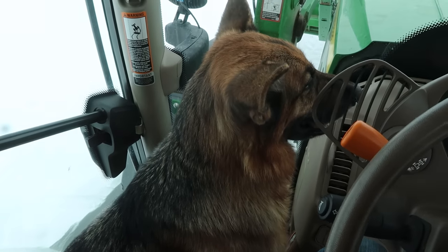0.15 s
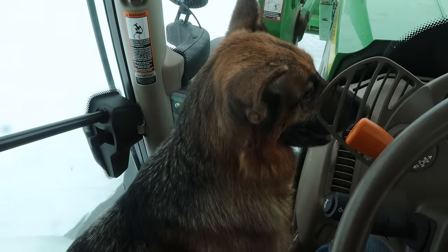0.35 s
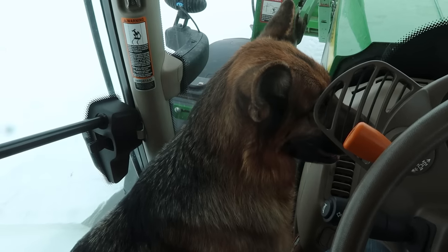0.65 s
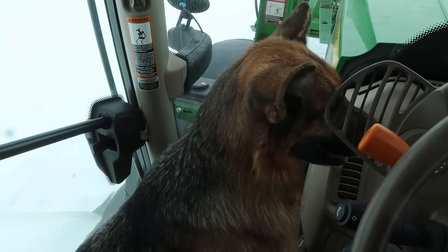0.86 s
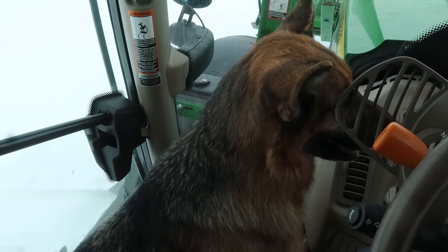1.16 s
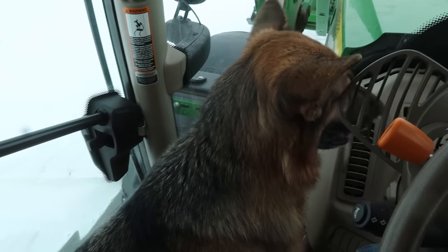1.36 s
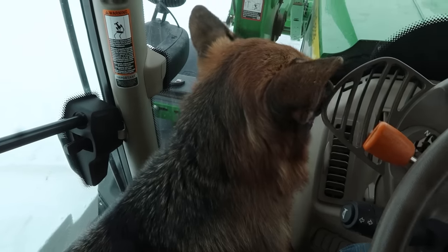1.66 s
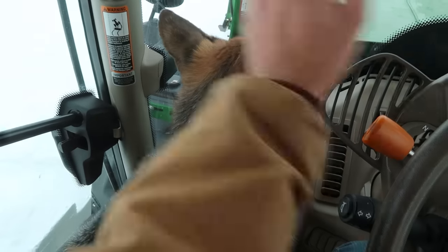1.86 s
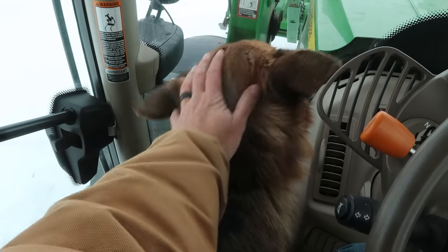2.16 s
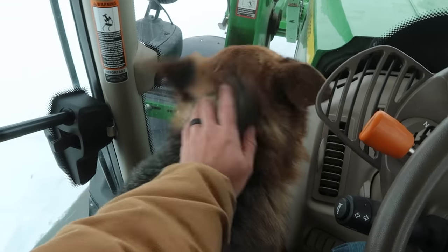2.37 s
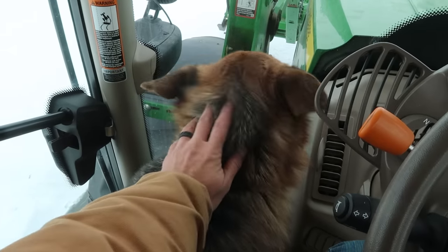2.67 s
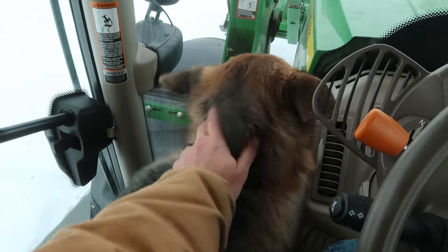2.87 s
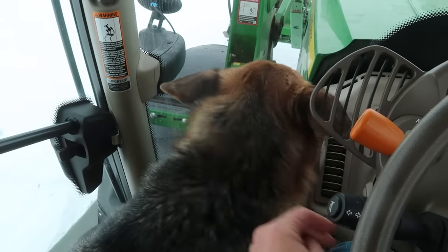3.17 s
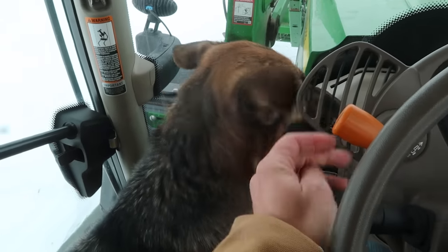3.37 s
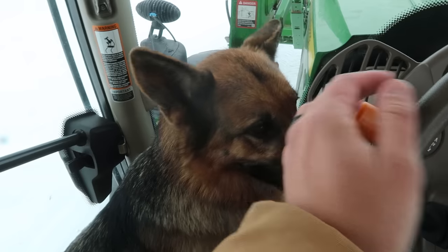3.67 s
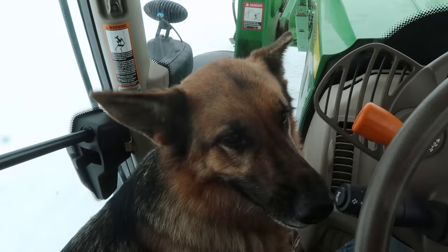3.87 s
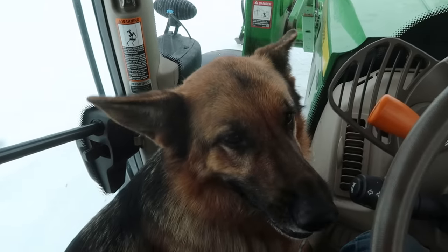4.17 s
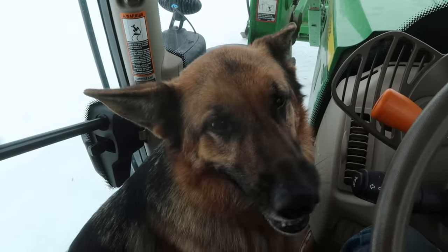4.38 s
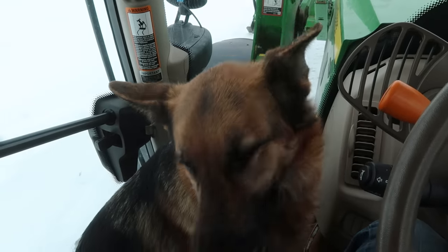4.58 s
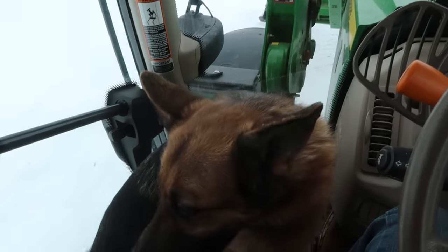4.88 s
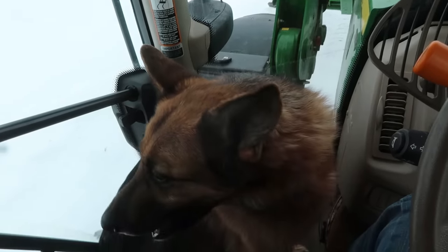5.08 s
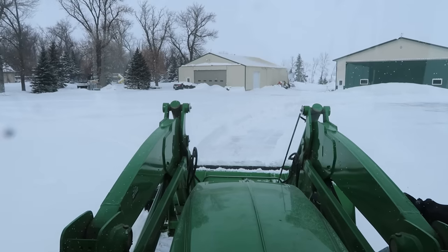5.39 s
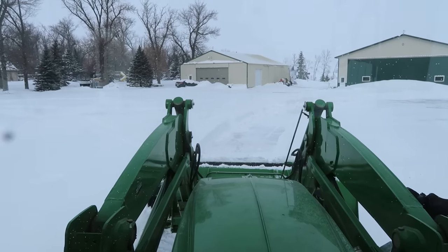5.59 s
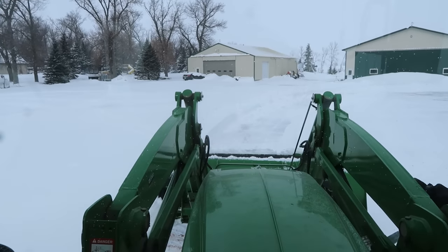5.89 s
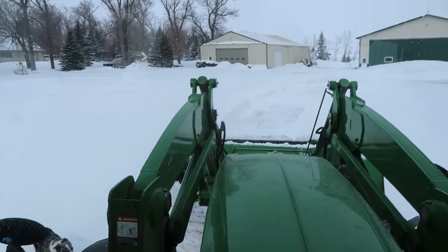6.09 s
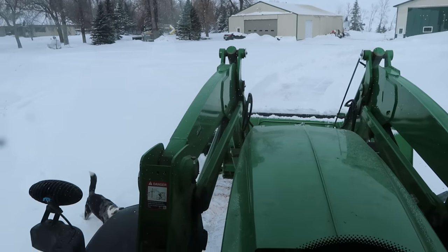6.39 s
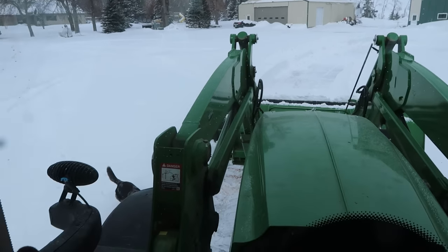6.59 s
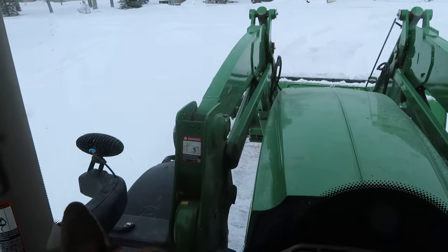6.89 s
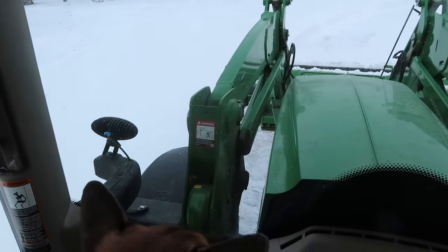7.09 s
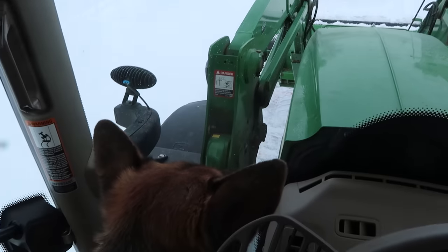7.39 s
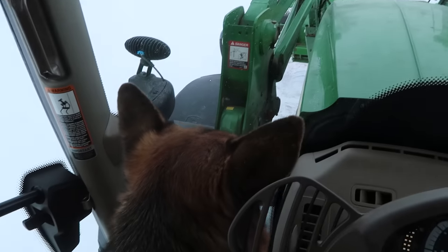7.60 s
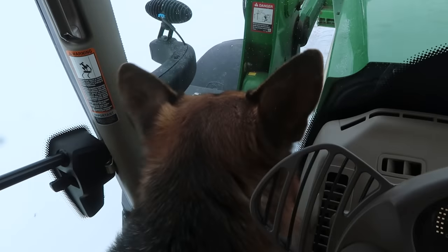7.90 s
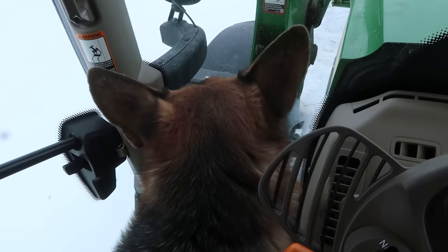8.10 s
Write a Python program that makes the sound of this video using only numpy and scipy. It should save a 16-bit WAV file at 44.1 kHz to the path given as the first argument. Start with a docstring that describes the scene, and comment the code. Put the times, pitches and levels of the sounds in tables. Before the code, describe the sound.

Inside a tractor cab, a diesel engine drones and roars while loose trim rattles, then the sound abruptly drops to a lower, rougher, surging rumble.

```python
"""A diesel tractor booms and roars in its cab as it drives a snowblower, heard on two close microphone ports.
A loose trim part rattles in bursts; the sound drops out for an instant and resumes lower in engine speed,
rougher, with a pump whine, a lumpy hum and one brushing scuff.
Boom is sines on the crank angle, roar is coloured noise that throbs with the engine, the trim is decaying
rings struck by random knocks, the whines are wavering tones and the scuff is filtered ticks."""
import sys
import numpy as np
from scipy import signal
from scipy.fft import rfft, irfft
from scipy.io import wavfile
from scipy.ndimage import uniform_filter1d

SR = 44100
rng = np.random.default_rng(int(sys.argv[2]) if len(sys.argv) > 2 else 0)


def transcribe(signal):
    """Save signal, clipped to [-1, 1], as a 16-bit WAV file at the path in sys.argv[1]."""
    frames = np.atleast_2d(signal).T
    limited = np.clip(frames, -1, 1)
    pcm = np.round(limited * 32767).astype(np.int16)
    wavfile.write(sys.argv[1], SR, pcm)


N = 363807
T = np.arange(N) / SR
DROP_OUT_S, RESUME_S = 5.21778, 5.24215  # silence between these times


def gain_of(db):
    """Amplitude factor of a level in dB."""
    return 10 ** (np.asarray(db) / 20)


def evened(x):
    """The signal brought to rms 1."""
    return x / np.sqrt(np.mean(x ** 2) + 1e-20)


def read(points, hz):
    """A spectrum curve read along log frequency."""
    f, value = np.transpose(points)
    return np.interp(np.log(hz + 1), np.log(f + 1), value)


def columns(rows, t):
    """Each column after the time column, drawn as straight lines over time."""
    s, *cols = np.transpose(rows)
    return [np.interp(t, s, col) for col in cols]


def bump(middle, half):
    """A flat-topped hump of height 1."""
    return np.exp(-((T - middle) / half) ** 4)


def add(mix, s, sound):
    """Add a sound into the mix in place, from time s on."""
    part = mix[round(s * SR):][:len(sound)]
    part += sound[:len(part)]


def waver(hz):
    """Slow chance with rms about 1, rolled off above the given rate."""
    steps = np.arange(4096) * 128 / SR
    rates = np.fft.rfftfreq(len(steps), steps[1])
    spectrum = rfft(rng.standard_normal(len(steps))) / (1 + (rates / hz) ** 4)
    return evened(np.interp(T, steps, irfft(spectrum)))


def noise(db):
    """Random short-time spectra under a field of dB per Hz (bins x frames)."""
    chance = rng.standard_normal(db.shape) + 1j * rng.standard_normal(db.shape)
    sound = signal.istft(gain_of(db) * chance, nperseg=4096, noverlap=3072)[1][:N]
    return sound * np.sqrt(3 * SR / 2 / 4096)


def boom(speed, levels, faint, mode, against, crank, waver_db, flicker_db, shared_db, slip_cycles):
    """Each crank order is a sine on the engine speed; uneven firing makes it waver. The main orders peak with a
    firing, those below the order `against` pull the other way, and a cab air mode delays those on and above it."""
    anchor_s, anchor_turns = crank
    turns = np.cumsum(speed) / SR
    turns = turns - np.interp(anchor_s, T, turns) + anchor_turns
    mode_order, mode_width, mode_gain = mode
    out, load_db = 0, shared_db * waver(5.4)
    for order, db in levels:
        order = round(order)
        air_mode = 1 - 1j * mode_gain / (1 + 2j * (order - mode_order) / mode_width)
        lag = np.angle(air_mode) + np.pi * (order < against)
        level = gain_of(db + load_db + waver_db * waver(9.4) + flicker_db * waver(16))
        cycles = order * turns + slip_cycles * waver(5)
        out = out + level * np.cos(2 * np.pi * cycles + lag)
    for order, db in faint:
        level = gain_of(db + 1.8 * waver(3.8))
        cycles = order * turns + rng.random() + 0.028 * waver(4.5)
        out = out + level * np.sin(2 * np.pi * cycles)
    return np.sqrt(2) * out, turns


def steady_speed():
    """Crank turns per second before the drop-out; the engine wanders a little."""
    # engine speed: (time [s], speed [turns/s])
    wandering = [(0, 34.95), (.4, 34.88), (.75, 34.97), (1.3, 34.71), (1.7, 34.97), (2.1, 35.16),
                 (2.45, 34.94), (2.9, 35.17), (3.3, 34.79), (3.52, 34.71), (3.9, 35.23), (4.1, 35.33),
                 (4.5, 35.17), (4.9, 34.79), (5.21, 34.85)]
    return columns(wandering, T)[0]


def steady_orders(speed):
    """Levels follow the speed as each order climbs or leaves a cab resonance, and drift slowly."""
    # main crank orders: (order [multiple], level [dB], slope [dB per extra turn/s], drift [dB/s])
    orders = [(1, -24.5, -3, 0.4), (2, -42.5, 9, 0), (3, -18, 7, -0.5), (4, -18.5, -4, -0.14),
              (5, -29.5, 5.5, -0.8), (6, -23, 5, -.5), (7, -35.5, -0.5, -2)]
    wander, since = speed - speed[T < DROP_OUT_S].mean(), T - DROP_OUT_S / 2
    return [(order, db + slope_db * wander + drift_db * since) for order, db, slope_db, drift_db in orders]


def steady_boom(speed):
    """The boom before the drop-out, with two higher gear meshes that grow as the load comes on."""
    # faint orders; unequal firing gives the halves, gears the high ones: (order [multiple], level [dB])
    faint = [(1.5, -46), (5.5, -38), (2.54, -48.5), (3.46, -35.5), (6.82, -36), (7.5, -40), (7.99, -40),
             (8.54, -43), (8.99, -41.5), (12, -45), (17.74, -44), (19.5, -47.5), (20.56, -45), (21.73, -41),
             (22.06, -39.5), (22.53, -43), (23.9, -45.5), (28.85, -45)]
    # gear meshes under load: (time [s], lower mesh [dB], upper mesh [dB])
    mesh_levels = [(0, -46, -44), (1.5, -45, -45.5), (1.9, -35, -35.5), (2.9, -36, -41.5), (3.4, -37, -47),
                   (4.0, -37, -42), (5.2, -44, -41)]
    meshes = list(zip((27.5, 36.1), columns(mesh_levels, T)))  # orders of the two meshes
    return boom(speed, steady_orders(speed), faint + meshes,
                mode=(3.95, .17, 6),  # cab air mode at the ports: order, width in orders, gain
                against=3,  # firings a turn
                crank=(DROP_OUT_S, .355),  # on a pressure peak as the sound drops out (s, turns)
                waver_db=0.5, flicker_db=0.64, shared_db=0.71, slip_cycles=0.011)


def lulls():
    """The dB by which the boom sags two or three times a second: slow sag, quick return."""
    # sags: (time [s], depth [dB])
    sags = [(5.44, -2), (5.59, -11.5), (6.0, -8.5), (6.42, -7), (6.69, -8), (6.84, -6), (7.14, -1.5),
            (7.37, -4), (7.71, -8.5), (8.12, -9)]
    sag_s, return_s = 0.11, 0.06
    return sum(db * np.exp(-((T - s) / np.where(T < s, sag_s, return_s)) ** 2) for s, db in sags)


def surging_orders():
    """Under uneven load all orders sag in the lulls and drift slowly; some swell or fade for a moment."""
    # main crank orders: (order [multiple], level between lulls [dB], share of each lull [1], drift [dB/s])
    orders = [(1, -31, 0.46, 0.5), (2, -31, 0.42, -0.5), (3, -24.5, .6, -0.4), (4, -17, 0.84, -0.5),
              (5, -26.5, 0.29, -0.5), (6, -36, 0.25, -1)]
    # passing swells: (order [multiple], middle [s], half length [s], rise [dB])
    swells = [(1, 5.38, 0.2, 15), (4, 5.79, 0.054, 0.5), (4, 6.54, 0.092, 2.5), (3, 5.6, 0.07, -9),
              (3, 6.22, 0.082, 4.5), (3, 7.6, .12, -3), (3, 7.13, 0.16, -9), (3, 5.72, .07, 2),
              (3, 7.47, 0.086, 6.5), (5, 5.8, 0.064, 2), (6, 6.2, .25, 5), (1, 7.78, .15, 6)]
    lull, since = lulls(), T - T[T > RESUME_S].mean()
    swell = {round(order): 0 for order, *_ in orders}
    for order, s, half, db in swells:
        swell[round(order)] = swell[round(order)] + db * bump(s, half)
    return [(order, db + share * lull + drift_db * since + swell[round(order)])
            for order, db, share, drift_db in orders]


def surging_boom():
    """The boom after the drop-out: a lower engine speed, with more phase slip and flicker."""
    # engine speed: (time [s], speed [turns/s])
    speed = [(5.24, 33.68), (6.0, 33.62), (7.0, 33.98), (7.6, 33.72), (8.25, 33.65)]
    # faint orders; unequal firing gives the halves, gears the high ones: (order [multiple], level [dB])
    faint = [(.5, -40.5), (5.5, -38.5), (17.73, -45.5), (32.65, -50.5), (55.2, -44.5)]
    return boom(columns(speed, T)[0], surging_orders(), faint,
                mode=(.8, 1, 30),  # cab air mode at the ports: order, width in orders, gain
                against=0,
                crank=(RESUME_S, .3),  # on a pressure peak as the sound resumes (s, turns)
                waver_db=0.4, flicker_db=1.0, shared_db=0.35, slip_cycles=0.036)


def roar(swell, treble, colour, panels, wide, turns, clatter, patchy_db):
    """Coloured noise that rings the panels, throbbing with the engine cycle and the firings."""
    hz, t = np.fft.rfftfreq(4096, 1 / SR)[:, None], np.arange(N // 1024 + 5) * 1024 / SR
    body, low = columns(swell, t)
    since = t - (swell[0][0] + swell[-1][0]) / 2
    upper, hiss, top = (share * body + drift_db * since for share, drift_db in treble)
    deep = 0.27 * np.interp(t, T, lulls())  # share of the lulls in the deepest roar
    # each band's swell gives way to the next around these frequencies
    moves, below = deep, deep
    for edge_hz, band in zip((190, 400, 1500, 5000, 7500), (low, body, upper, hiss, top)):
        moves = moves + (band - below) / (1 + (edge_hz / (hz + 1)) ** 6)
        below = band
    rings = sum(db / (1 + (2 * (hz - f) / width) ** 2) for f, width, db in panels)
    grain = uniform_filter1d(rng.standard_normal(moves.shape), 5, 0)
    patches = evened(uniform_filter1d(grain, 6, 1))
    common = noise(read(colour, hz) + rings + moves + patchy_db * patches)
    apart = noise(read(wide, hz) + .4 * rings + moves)
    # one engine cycle takes two turns and holds six firings
    pulses = np.cos(np.pi * turns) + .7 * np.cos(3 * np.pi * turns) + 1.3 * np.cos(6 * np.pi * turns)
    throb = 1 + clatter * pulses + 0.066 * waver(23)
    return np.array([common * throb, apart * throb])


def steady_roar(turns):
    """Roar of engine, gears and blower before the drop-out."""
    # swell about the mean: (time [s], body [dB], low lumps [dB])
    swell = [(0, -1, 1.5), (.5, -0.5, 0), (1.0, -0.5, 2), (1.45, 0.5, 2.5), (1.8, 1, 2), (2.3, 0.5, 3),
             (2.9, 1, 2), (3.25, 0, -2), (3.55, 2.5, 3), (4.45, -3.5, -4), (5.0, 0, -0.5), (5.21, 1, 4)]
    # upper body, hiss, highest hiss: (share of the body's swell [1], drift [dB/s])
    treble = [(.4, 0.046), (.8, 0.043), (1.1, .05)]
    # colour common to both ports: (frequency [Hz], density [dB per Hz])
    colour = [(20, -63), (50, -59.5), (82, -60.5), (120, -54), (160, -57.5), (200, -55), (270, -52),
              (460, -60.5), (900, -63), (1500, -62), (2800, -71.5), (3600, -77), (5200, -86.5), (7500, -95),
              (10800, -99), (13500, -117)]
    # cab panels that the roar rings: (frequency [Hz], width [Hz], height over the roar [dB])
    panels = [(239, 23, 6.5), (409, 14, 7), (492, 20, 6.5), (548, 27, 5.5), (625, 15, 8.5), (675, 31, 5),
              (752, 54, 9.5), (799.5, 24, 9), (830, 20, 6), (935, 11, 8), (997.4, 22, 11.5),
              (1067, 12, 6.5), (1274, 65, 6), (1384, 47, 2.5), (1696, 34, 3.5), (2394, 26, 9)]
    # colour differing between the ports: (frequency [Hz], density [dB per Hz])
    wide = [(40, -82), (130, -68), (250, -86.5), (420, -74), (800, -86.5), (1300, -75.5), (2400, -81),
            (3200, -81.5), (5300, -87), (8000, -93), (11000, -91.5), (13000, -92), (15100, -103)]
    return roar(swell, treble, colour, panels, wide, turns, clatter=0.046, patchy_db=1.5)


def surging_roar(turns):
    """Roar of engine, gears and blower after the drop-out."""
    # swell about the mean: (time [s], body [dB], low lumps [dB])
    swell = [(5.24, -3, 0.5), (5.5, -0.5, -7), (5.75, 1.5, 2), (6.2, -0.8, -1.5), (6.5, -0.5, 2),
             (6.74, -2, 1), (7.0, 3.5, 6), (7.24, 0, -1), (7.7, 1.5, 3), (8.25, 0.5, 0)]
    # upper body, hiss, highest hiss: (share of the body's swell [1], drift [dB/s])
    treble = [(0.33, .7), (.6, 1.8), (.3, 3.1)]
    # colour common to both ports: (frequency [Hz], density [dB per Hz])
    colour = [(20, -55.5), (55, -49), (85, -48), (160, -47.5), (280, -51), (500, -56.5), (900, -62),
              (1500, -64), (2800, -64.5), (3600, -74), (5200, -86.5), (7500, -98.5), (10800, -110),
              (13500, -130)]
    # cab panels that the roar rings: (frequency [Hz], width [Hz], height over the roar [dB])
    panels = [(103.4, 20, 9.5), (137, 16, 5), (241, 16, 5.5), (355, 47, 5.5), (592, 36, 2.5), (700, 50, 3),
              (817, 25, 3.5), (1120, 91, -6.5), (1215, 67, 3.5), (1360, 22, 6), (1610, 54, -1),
              (1780, 22, 4), (2205, 60, 5), (2470, 120, 5), (2790, 110, 4)]
    # colour differing between the ports: (frequency [Hz], density [dB per Hz])
    wide = [(50, -85), (130, -74), (250, -72.5), (420, -75.5), (800, -81), (1300, -75.5), (2250, -76),
            (2450, -69.5), (2650, -78), (3200, -77.5), (5300, -89), (8000, -97.5), (12000, -101),
            (15100, -115)]
    return roar(swell, treble, colour, panels, wide, turns, clatter=0.044, patchy_db=1.5)


def rattle(turns):
    """The trim chatters against its frame in short bursts, its knocks a little stronger on the firings."""
    # bursts, before fades are added: (middle [s], length [s], chatter [dB], main ring [dB])
    bursts = [(0.01, 0.02, -42, -44), (0.08, .045, -57, -54), (.148, .045, -59, -51),
              (.219, 0.035, -50, -48), (.267, 0.036, -48, -46), (0.316, 0.042, -42, -50),
              (0.406, .094, -54, -50), (0.507, 0.047, -48, -48), (0.56, 0.042, -47, -48),
              (0.633, 0.063, -44, -45), (0.7, 0.13, -46, -46.5), (.79, .046, -45, -52),
              (0.878, 0.11, -45, -45.5), (1.047, 0.067, -43, -48), (1.159, 0.099, -43.5, -49),
              (1.268, 0.12, -51, -55), (1.466, 0.044, -40, -49), (1.526, 0.039, -42, -47),
              (1.598, 0.05, -43.5, -52), (1.674, 0.088, -41.5, -45), (1.747, .048, -46, -48),
              (1.849, 0.056, -38.5, -45), (1.94, 0.058, -39.5, -44), (2.042, 0.041, -46, -49),
              (2.15, .045, -43, -54), (2.244, 0.076, -42.5, -46), (2.317, 0.054, -45, -45),
              (2.385, .044, -54, -47), (2.443, 0.038, -45, -51), (2.495, 0.049, -43, -48),
              (2.568, 0.059, -41, -49), (2.66, 0.13, -41, -49), (2.782, 0.062, -39, -44),
              (2.856, 0.068, -42, -46), (3.075, 0.16, -42, -47.5), (3.193, .04, -50, -50),
              (3.25, 0.04, -45, -48), (3.3, .041, -46, -52), (3.365, 0.042, -47, -50),
              (3.44, 0.07, -41, -45), (3.509, 0.056, -39.5, -47), (3.578, 0.035, -40, -49),
              (3.675, 0.051, -42, -46), (3.82, 0.048, -41, -58), (3.89, 0.061, -45, -46.5),
              (4.013, 0.04, -39.5, -53), (4.102, 0.02, -46, -46), (4.232, 0.064, -44, -51),
              (4.33, 0.035, -44, -50), (4.58, 0.045, -38.5, -48), (4.704, 0.095, -39.5, -43),
              (4.81, .084, -41.5, -45), (4.965, 0.043, -40, -49), (5.068, 0.055, -39.5, -45),
              (5.135, 0.058, -38.5, -44)]
    # louder squeaks: (middle [s], half length [s], rise [dB])
    squeaks = [(3.68, .04, 19), (3.86, .07, 19), (4.025, .03, 23), (4.9, .22, 14)]
    # rings of the trim: (frequency [Hz], level [dB], t60 [s], driven by [0 chatter, 2 squeak])
    trim = [(1472, -4.5, 0.051, 0), (1679, 0, 0.071, 0), (1806, -2.5, 0.045, 0), (2085, 3, 0.0053, 0),
            (2056, -2.5, 0.058, 0), (2395, -9.5, 0.064, 0), (2647, -4, 0.016, 0), (3380, -7.5, 0.026, 0),
            (3570, -11.5, 0.021, 0), (4630, -11, .04, 0), (4830, -12.5, 0.04, 0), (6200, 0.5, .07, 2)]
    # high rings slide as the trim shifts in its seat, and a twin just under the main takes over for a while:
    # (time [s], main [Hz], lower [Hz], lower level [dB], main level [dB], twin level [dB])
    sliding = [(0, 4560, 3930, 0, -2, -9), (.9, 4490, 3940, -1.5, 0, -10), (1.3, 4500, 3860, -3, -2, -2),
               (1.8, 4520, 3950, -1, 0, -8), (2.2, 4460, 3890, -3, -8, -0.5), (2.7, 4520, 3870, -1, -7, 0),
               (3.05, 4480, 3860, -4, -3, -3.5), (3.8, 4510, 3850, -2.5, -6, -0.5),
               (4.3, 4470, 3880, -1, -1, -7), (5.2, 4475, 3860, -4, 1, -10)]
    idle_db = [-60, -61]  # chatter and main ring between the bursts
    out, t = np.zeros((2, N)), np.arange(2500) / SR
    pushes = gain_of(np.add.outer(3.2 * waver(5.6), idle_db))
    for s, length, *dbs in bursts:
        burst = signal.windows.tukey(round((length + 0.034) * SR), .85)
        add(pushes, max(s - len(burst) / 2 / SR, 0), np.outer(burst, gain_of(dbs)))
    squeak_db = -34.5 + sum(db * bump(s, half) for s, half, db in squeaks)  # relative to the chatter
    pushes = np.column_stack([pushes, pushes[:, 0] * gain_of(squeak_db)])
    main_hz, lower_hz, lower_db, main_db, twin_db = columns(sliding, T)
    modes = [(hz, db + 2 * waver(2.4), t60, driver) for hz, db, t60, driver in trim]  # each comes and goes
    modes += [(main_hz, main_db, .05, 1), (4340, twin_db, .055, 1), (lower_hz, lower_db, .025, 1)]
    for hz, db, t60, driver in modes:
        hits = rng.random(N) < 3000 / SR  # 3000 knocks a second on average
        knocks = np.exp(2j * np.pi * rng.random((2, N))) * hits * (1 + 0.14 * np.cos(6 * np.pi * turns))
        decay = gain_of(-60 * t / t60) * (1 - np.exp(-t / 0.00012))
        decay = decay[None] / np.linalg.norm(decay)
        rung = signal.oaconvolve(knocks * pushes[:, round(driver)], decay)[:, :N]
        carrier = np.exp(2j * np.pi * np.cumsum(hz * np.ones(N)) / SR)
        out += gain_of(db) * (rung * carrier).real / knocks.real.std()
    # the part common to both ports, and a fainter part that differs between them
    return out * gain_of([[0], [-11]])


def whine(hz, rows, third_db):
    """A thin tone and its third multiple; pitch and level flutter a little."""
    db = columns(rows, T)[0]
    phase = 2 * np.pi * np.cumsum(hz + 1.792 * waver(6.33)) / SR
    level = gain_of(db + 1.1 * waver(8.2) + 1.1 * waver(21))
    return np.sqrt(2) * level * (np.sin(phase) + gain_of(third_db) * np.sin(3 * phase))


def gear_whine(speed):
    """A gear tone that follows the engine speed."""
    # level: (time [s], level [dB])
    levels = [(0, -41), (.9, -37.5), (2.0, -36), (2.8, -32.5), (3.6, -38.5), (4.3, -35.5), (5.2, -38.5)]
    return whine(12.48 * speed, levels, third_db=-21)


def pump_whine():
    """A pump tone on a nearly fixed pitch."""
    # level: (time [s], level [dB])
    levels = [(5.25, -31), (6.0, -32.5), (6.4, -34), (6.55, -28.5), (6.7, -36), (6.85, -25), (6.93, -34),
              (7.03, -26), (7.18, -36), (7.299, -24.5), (7.95, -24), (8.25, -21.5)]
    return whine(348.6, levels, third_db=-16)


def panel_hum():
    """A panel hums in lumps late on."""
    # level: (time [s], level [dB])
    levels = [(6.67, -47), (6.8, -26), (6.87, -34), (6.93, -22), (6.99, -38), (7.07, -20), (7.11, -23),
              (7.22, -45), (7.4, -44), (7.55, -28.5), (7.75, -28), (7.97, -34), (8.02, -38), (8.16, -22),
              (8.2, -44)]
    return whine(247, levels, third_db=-27)


def drifting_whine():
    """A thin whine whose pitch drifts late on."""
    # level and pitch: (time [s], level [dB], frequency [Hz])
    drift = [(5.25, -46, 1222), (5.8, -49, 1225), (5.95, -41.5, 1242), (6.4, -52, 1238), (6.75, -46, 1214),
             (6.95, -43, 1215), (7.4, -39.5, 1221), (7.8, -46, 1227), (8.25, -45, 1210)]
    return whine(columns(drift, T)[1], drift, third_db=-31.5)


def scuff():
    """Something brushes near the ports: dense ticks swell in, ring a part, and leave a longer bright fringe."""
    start_s, length_s, level_db = 5.86, 0.025, -26
    since = np.maximum(T - start_s, 0)
    rise = np.minimum(since / 0.007, 1)
    ticks = rng.standard_normal((4, N)) * (rng.random(N) < 9000 / SR)
    rasp = signal.sosfilt(signal.butter(3, [1500, 3700], "band", fs=SR, output="sos"), ticks[:2])
    body = sum(signal.lfilter(*signal.iirpeak(hz, 7, SR), rasp) for hz in (2300, 3170))  # the brushed part
    rasp = .5 * rasp + body
    fringe = signal.sosfilt(signal.butter(4, [3500, 7800], "band", fs=SR, output="sos"), ticks[2:])
    # rows: common to both ports, differing between them
    rasp = evened(rasp) * gain_of([[0], [-9]]) * np.exp(-(since / length_s) ** 4)
    fringe = evened(fringe) * gain_of([[-19], [-19]]) * np.exp(-(since / (1.15 * length_s)) ** 3)
    return gain_of(level_db) * rise * (rasp + fringe)


def scene():
    """Two stretches around the drop-out, each held as a common and a differing part, then spread to the ports."""
    speed = steady_speed()
    first_boom, first_turns = steady_boom(speed)
    second_boom, second_turns = surging_boom()
    first = steady_roar(first_turns) + rattle(first_turns)
    second = surging_roar(second_turns) + scuff()
    first[0] += gear_whine(speed)
    second[0] += pump_whine() + panel_hum() + drifting_whine()
    before, after = T < DROP_OUT_S, T > RESUME_S
    common, apart = first * before + second * after
    # the left port hears the roar a shade later and duller, and the boom a little later still
    slope = np.gradient(common)
    apart += -.2 * slope + .2 * np.gradient(slope)
    common += first_boom * before + second_boom * after
    apart -= 0.66 * (np.gradient(first_boom) * before + np.gradient(second_boom) * after)
    return np.array([common + apart, common - apart])


def record(dry):
    """A linear-phase low-pass limits the band to about 15.3 kHz."""
    low_pass = signal.firwin(511, 15300, window=("kaiser", 9), fs=SR)
    return signal.oaconvolve(dry, low_pass[None], "same")


dry = scene()
out = record(dry)
transcribe(out)
```